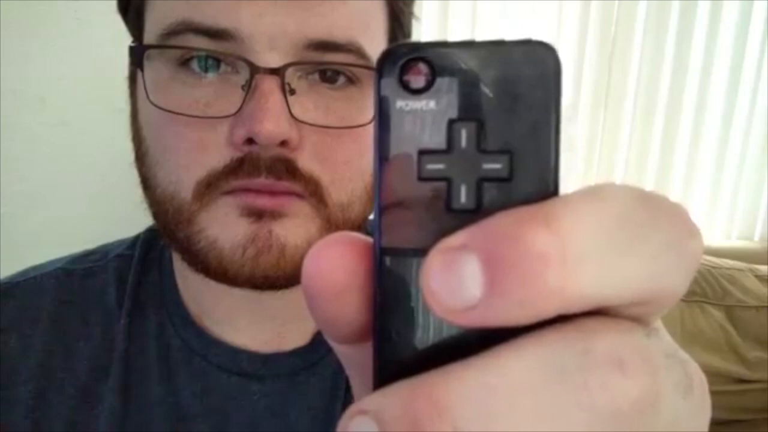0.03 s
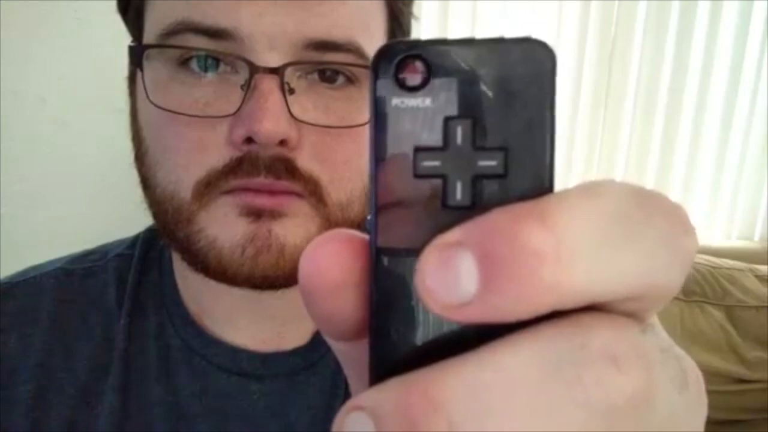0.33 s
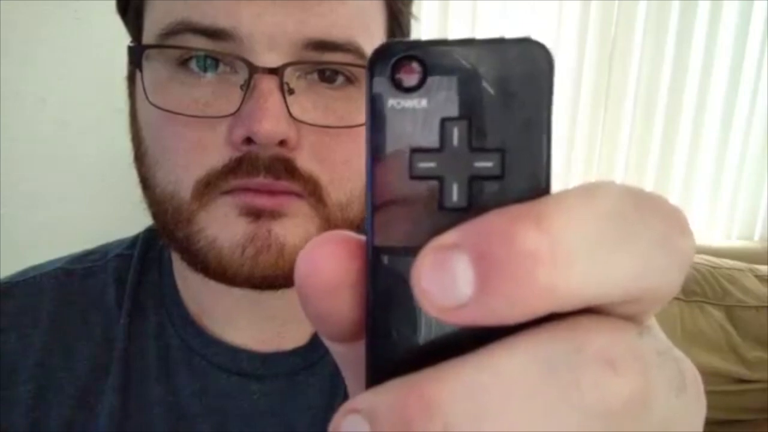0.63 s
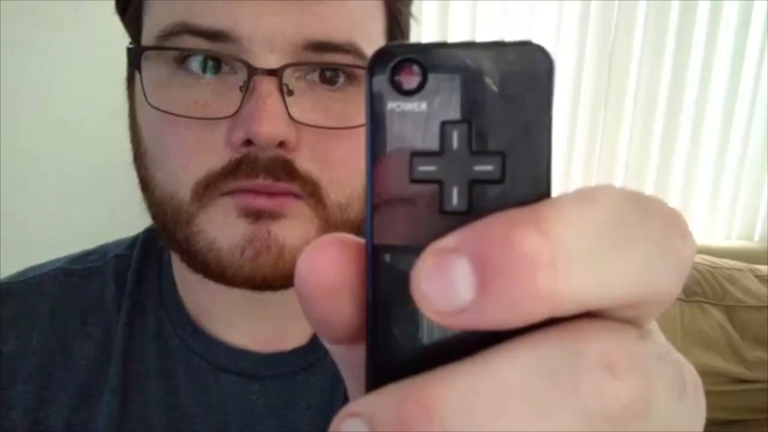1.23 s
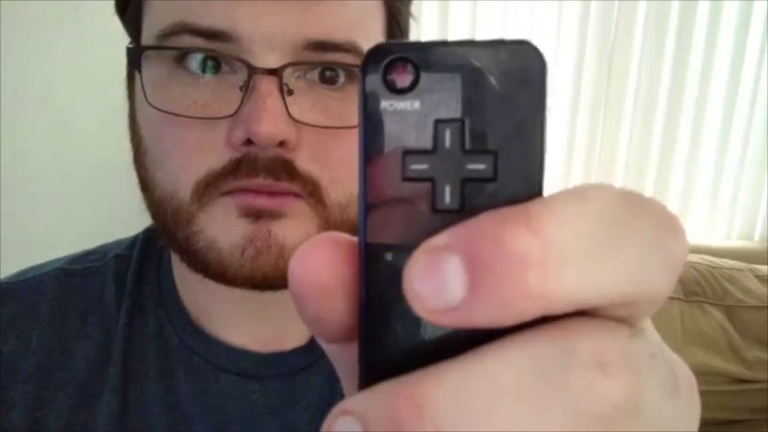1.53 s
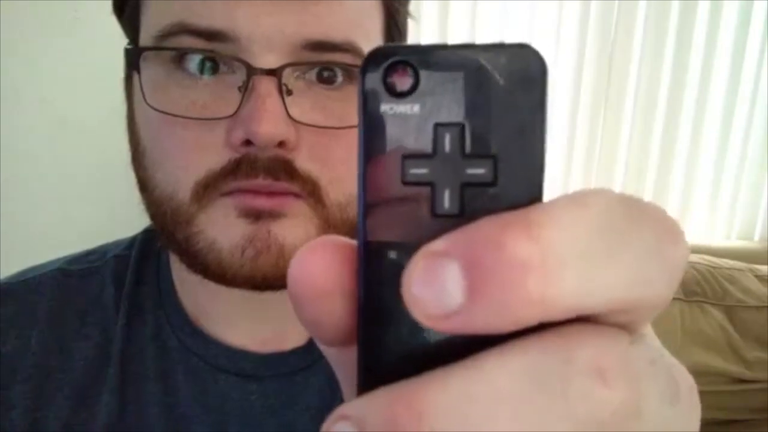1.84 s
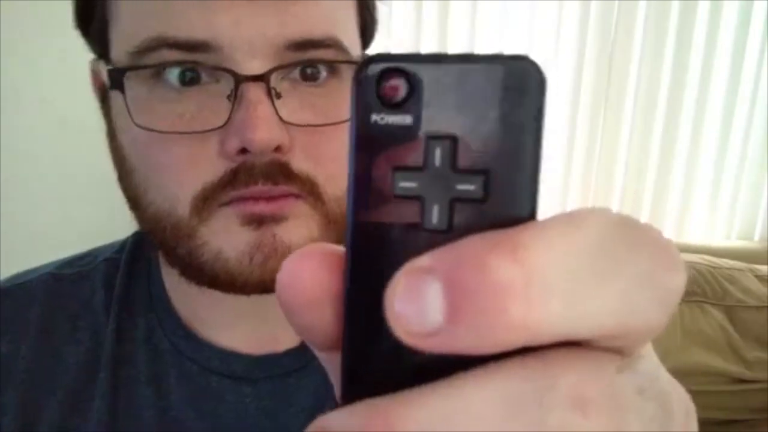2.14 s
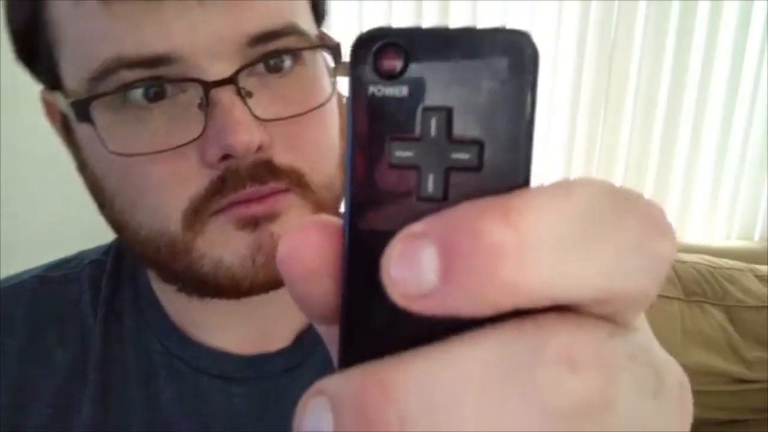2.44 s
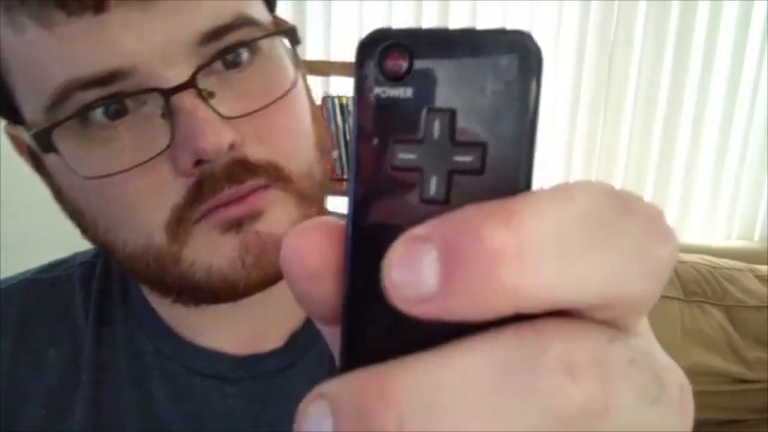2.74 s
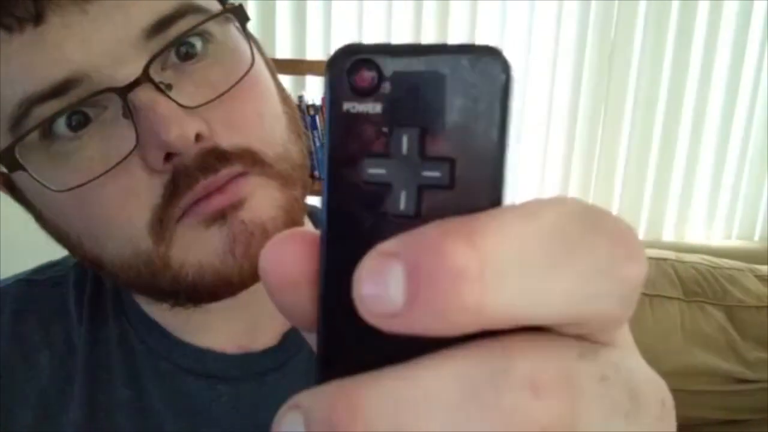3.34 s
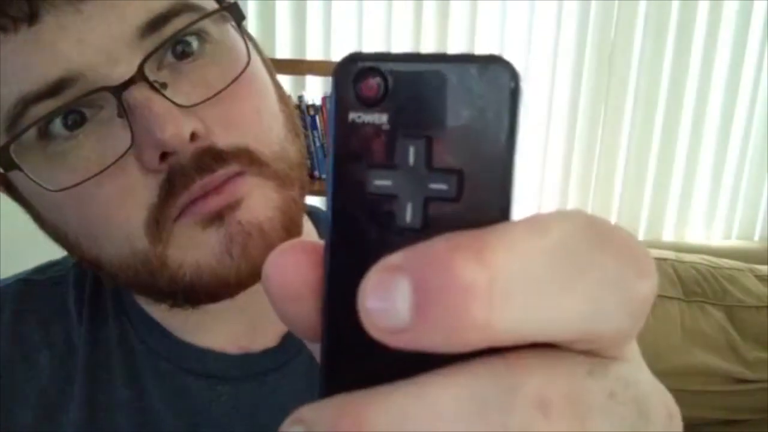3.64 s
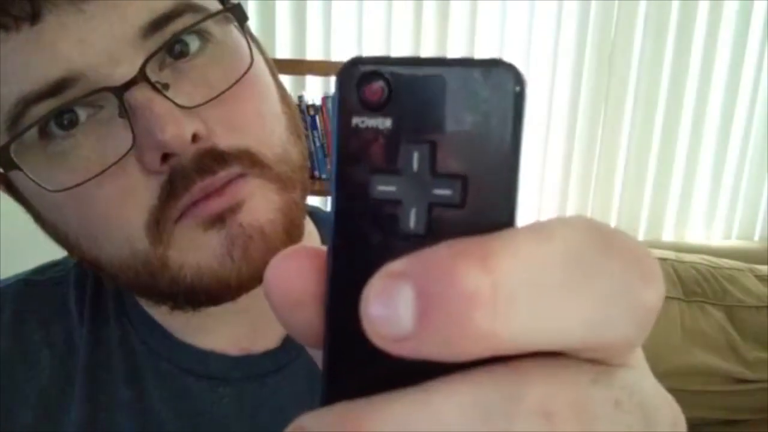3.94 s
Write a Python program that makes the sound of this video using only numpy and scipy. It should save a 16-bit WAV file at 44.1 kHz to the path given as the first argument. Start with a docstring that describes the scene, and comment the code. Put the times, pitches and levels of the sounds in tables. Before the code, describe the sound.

A game controller's rumble motor buzzes close up from about 0.1 seconds until the end at 4, pulsing roughly five times a second. Each pulse climbs in pitch then sags, with a low drone and a raspy chatter in the plastic case. Steady, dull room noise lies behind it. A faint low hum swells around 2 and 3 seconds, with soft bumps near 2.2 and 2.9 seconds.

```python
"""The rumble motor of a handheld game controller buzzes in pulses, about five a second, heard up close.
It speeds up while powered and coasts between pulses. Its off-centre weight hums once a turn,
and its rotor (the spinning part) chatters and rubs in the plastic case.
Behind it are steady room noise, a low hum that swells twice and two soft bumps."""
import sys
import numpy as np
from scipy import signal
from scipy.fft import rfft, irfft
from scipy.io import wavfile
from scipy.ndimage import uniform_filter1d

SR = 44100
rng = np.random.default_rng(int(sys.argv[2]) if len(sys.argv) > 2 else 0)


def store_wav(level_fs):
    """Save 16-bit WAV to argv[1]."""
    pcm = np.round(np.clip(np.atleast_2d(level_fs), -1, 1) * 32767)
    wavfile.write(sys.argv[1], SR, pcm.T.astype(np.int16))


N = 176400
T = np.arange(N) / SR

# When the motor gets power. Each row: switch-on time in seconds, switch-off time in seconds.
POWER_PULSES = [(0.0701, 0.193), (0.2551, 0.3965), (0.4583, 0.5997), (0.6626, 0.8033), (0.8655, 0.9666),
                (1.0305, 1.1725), (1.2345, 1.3421), (1.4039, 1.5028), (1.5648, 1.7071), (1.7717, 1.8751),
                (1.9365, 2.0401), (2.099, 2.2455), (2.3067, 2.409), (2.4708, 2.5724), (2.6344, 2.736),
                (2.7977, 2.9001), (2.961, 3.1036), (3.1687, 3.3125), (3.373, 3.5175), (3.5769, 3.7216),
                (3.7817, 3.9271), (3.9854, 4.1)]
# The tones in the chatter. Each row: cycles per turn, base level in dB when powered, and when coasting.
CHATTER_TONES = [(9, -54.0, -63.1), (10, -51.5, -57.0), (11, -57.2, -59.5), (13, -51.0, -62.4),
                 (14, -54.2, -53.7), (15, -43.3, -58.4), (16, -45.4, -47.3), (17, -49.3, -48.4),
                 (18, -50.1, -56.1), (19, -44.7, -55.7), (20, -41.2, -51.1), (21, -45.8, -54.5),
                 (22, -46.1, -46.5), (23, -42.3, -50.6), (24, -45.2, -44.3), (25, -37.8, -42.1),
                 (26, -39.8, -40.7), (27, -41.3, -41.8), (28, -44.2, -47.0), (29, -52.2, -48.6),
                 (30, -60.9, -58.5), (31, -60.0, -61.7), (32, -57.5, -58.2), (33, -54.9, -61.3),
                 (35, -61.8, -68.8), (36, -63.1, -70.5), (37, -62.4, -65.9), (38, -59.5, -66.8),
                 (39, -67.1, -64.0), (40, -68.2, -68.8), (41, -62.9, -67.8), (44, -76.3, -69.9),
                 (46, -70.0, -73.8)]
# Spots where the rotor catches, the main one first. Each row: position in turns, middle and spread
# of its tones in cycles per turn, strength in dB when powered, and when coasting.
CATCH_SPOTS = [(0, 25.8, 2.6, -1, -12), (.05, 16.5, 2.2, -7.5, -12.5), (.23, 20.3, 2, -9.5, -25),
               (.6, 23.5, 2.8, -5, -19), (.5, 15.5, 2, -9, -12.5), (-.08, 35, 3, -30, -21)]
# A lift, while powered, for tones far from those of the main catch. Each row: time in seconds, lift in dB.
OUTER_TONE_LIFT = [(0, 0), (.6, 1.5), (1.4, 1), (2.2, 1), (2.7, 2), (3.1, 1.5), (4, 1.5)]
# How the plastic case colours the chatter. Each row: frequency in Hz, boost or cut in dB.
CASE_COLOUR = [(1200, 0), (1550, -5), (1900, -3), (2100, 1), (2300, 1), (2450, 1), (2750, -1.2),
               (3000, -.8), (3300, 1.5), (3650, .8), (3900, -1.5), (4250, -3.5), (4450, -.5), (5500, -1.5),
               (5780, 4), (6200, -1)]
# The colour of the rubbing noise. Each row: frequency in Hz, relative level in dB.
RUB_COLOUR = [(1200, -33), (1800, -13), (2150, -5), (2450, 4.5), (2700, -3), (3000, -10), (3400, 2),
              (4100, -6), (4900, -10.5), (5800, -9), (6250, -13), (6650, -12.5), (7500, -25)]
# The colour of the room noise. Each row: frequency in Hz, relative level in dB.
ROOM_COLOUR = [(20, -1.5), (45, -7), (70, -4.5), (110, -2), (170, 0.5), (260, -2), (350, -5.5), (480, -6),
               (600, -9), (850, -11), (1100, -13), (1300, -13.5), (1550, -16), (2200, -17.5), (3200, -17.5),
               (4300, -25), (6000, -31.5), (6650, -30), (7300, -32.5), (9300, -34), (9950, -32),
               (10700, -34.5), (15000, -36.5)]
# How the low hum swells. Each row: time in seconds, level in dB.
HUM_SWELLS = [(0, -54), (1.4, -54), (1.72, -47), (1.88, -37.5), (2.15, -38.5), (2.32, -47), (2.5, -52),
              (2.68, -37), (2.98, -38), (3.12, -37), (3.28, -49), (4, -62)]
# Soft bumps. Each row: middle time and length in seconds, pitch and pitch spread in Hz, level in dB.
SOFT_BUMPS = [(2.2, 0.068, 42, 30, -32), (2.932, 0.091, 166, 22, -27)]

USUAL_HZ = 130  # the motor's usual speed, in turns per second


def motor():
    """One spinning shaft drives the weight's hum, the rubbing and the chatter, so all keep in step."""
    speed, power = shaft_speed(), powered()
    turns = .085 + np.cumsum(speed) / SR + .0005 * drift(rate_hz=40)  # with a tiny jitter
    return weight_hum(speed, turns) + rubbing(speed, turns, power) + chatter(speed, turns, power)


def shaft_speed():
    """Turns per second: climbs toward top speed while powered and sinks while coasting."""
    start_hz, top_hz, spin_up_s, coast_s = 98.75, 155.553, .09036, .23339
    speed = np.full(N, start_hz)
    for on, off in POWER_PULSES:
        for start_s, goal_hz, lag_s in (on, top_hz, spin_up_s), (off, 0, coast_s):
            i = min(round(start_s * SR), N - 1)
            speed[i:] = goal_hz + (speed[i] - goal_hz) * np.exp(-T[:N - i] / lag_s)
    return speed


def powered():
    """1 while powered, 0 while coasting; the rotor takes a moment to shift on its shaft in between."""
    shift_s = 0.0044
    switched_on = 1.0 * (sum((T > on) & (T < off) for on, off in POWER_PULSES) > 0)
    keep = np.exp(-1 / (shift_s * SR))
    return signal.lfilter([1 - keep], [1, -keep], switched_on)


def weight_hum(speed, turns):
    """The off-centre weight shakes the case once a turn, much harder as it spins faster."""
    level_db = -36 + drift(rate_hz=4)
    return np.sqrt(2) * np.cos(2 * np.pi * turns) * (speed / USUAL_HZ) ** 4.4 * amp(level_db)


def chatter(speed, turns, power):
    """The rotor catches at the same spots each turn, so its tones bunch into short bursts."""
    out = np.zeros(N)
    lift_db = np.interp(T, *np.transpose(OUTER_TONE_LIFT)) + 1.6 * 20 * np.log10(speed / USUAL_HZ)
    _, main_middle, main_spread = CATCH_SPOTS[0][:3]
    for per_turn, powered_db, coasting_db in CHATTER_TONES:
        outer = 1 - np.exp(-((per_turn - main_middle) / main_spread) ** 2 / 2)  # 1 far from the main catch
        phase = 2 * np.pi * per_turn * turns
        driven = amp(powered_db + outer * lift_db) * np.cos(phase + catch_phase(per_turn, coasting=False))
        coasting = amp(coasting_db + 2.6) * np.cos(phase + catch_phase(per_turn, coasting=True))
        case_gain = amp(colour_db(CASE_COLOUR, per_turn * speed))
        out += case_gain * (power * driven + (1 - power) * coasting)
    level_db = 2.2 - 0.23 * drift(rate_hz=30) + 0.04 * (T - T.mean())  # flickers and grows a little
    return out * amp(level_db) * (speed / USUAL_HZ) ** 0.81


def catch_phase(per_turn, coasting):
    """Shifts one tone, in radians, so its peaks lean toward the catches that ring it most."""
    pull = 0
    for position, middle, spread, powered_db, coasting_db in CATCH_SPOTS:
        strength = amp(coasting_db if coasting else powered_db)
        nearness = np.exp(-((per_turn - middle) / spread) ** 2 / 2)
        pull += strength * nearness * np.exp(-2j * np.pi * per_turn * position)
    return np.angle(pull)


def rubbing(speed, turns, power):
    """The rotor rubs with a hiss that gathers at the main catch, loudest when slow or coasting."""
    hiss = noise(lambda hz: amp(colour_db(RUB_COLOUR, hz)))
    at_catch = np.exp(.6 * np.cos(np.pi * turns) ** 2)
    coasting_gain = amp(4.5 * (1 - power))
    return amp(-42.5) * evened(hiss * at_catch * coasting_gain / (speed / USUAL_HZ) ** 2)


def room():
    """Steady, dull room noise that wavers in faint patches; its lower part slowly grows."""
    hz, times, spectrum = signal.stft(rng.standard_normal(N), SR, nperseg=1024, noverlap=768)
    patches = uniform_filter1d(rng.standard_normal(spectrum.shape), size=10, axis=0)  # blur over pitch
    patches = evened(uniform_filter1d(patches, size=12, axis=1))  # then over time
    growth_db = 0.34 * np.outer(np.exp(-(hz / 2000) ** 2), times - times.mean())
    spectrum *= amp(colour_db(ROOM_COLOUR, hz)[:, None] + 0.99 * patches + growth_db)
    return amp(-28.5) * evened(signal.istft(spectrum, nperseg=1024, noverlap=768)[1][:N])


def low_hum():
    """A low, slightly unsteady tone that swells twice."""
    pitch_hz = 72 + 0.87 * drift(rate_hz=5.6)
    level_db = np.interp(T, *np.transpose(HUM_SWELLS))
    return np.sqrt(2) * amp(level_db) * np.sin(2 * np.pi * np.cumsum(pitch_hz) / SR)


def bumps():
    """Short, soft swells of deep noise."""
    out = np.zeros(N)
    for middle_s, length_s, pitch_hz, spread_hz, level_db in SOFT_BUMPS:
        swell = np.exp(-(2 * (T - middle_s) / length_s) ** 2)
        bump = swell * noise(lambda hz: np.exp(-((hz - pitch_hz) / spread_hz) ** 2))
        out += amp(level_db) * bump * np.linalg.norm(swell) / np.linalg.norm(bump)
    return out


def amp(db):
    """Turns decibels into a number to multiply by."""
    return 10 ** (db / 20)


def evened(x):
    """Scales a signal so its typical size (rms) is 1."""
    return x / np.sqrt(np.mean(x ** 2) + 1e-20)


def colour_db(table, hz):
    """Looks up a level in dB, sliding between the table's rows by musical pitch."""
    row_hz, row_db = np.transpose(table)
    return np.interp(np.log(hz + 1), np.log(row_hz + 1), row_db)


def noise(shape):
    """Noise of typical size 1; shape(hz) says how strong each frequency is."""
    return evened(irfft(rfft(rng.standard_normal(N)) * shape(np.fft.rfftfreq(N, 1 / SR)), N))


def drift(rate_hz):
    """A smooth random wobble, mostly slower than rate_hz."""
    return noise(lambda hz: np.exp(-(hz / rate_hz) ** 2))


def scene():
    """The motor and its background, the same in both channels."""
    return np.tile(motor() + room() + low_hum() + bumps(), (2, 1))


def record(dry):
    """Fades the sound in quickly and cuts off the highest treble."""
    silent_s, fade_s, cutoff_hz = 0.08, 0.026, 15100
    fade_in = np.sin(np.pi / 2 * np.clip((T - silent_s) / fade_s, 0, 1)) ** 2
    treble_cut = signal.firwin(511, cutoff_hz, window=("kaiser", 9), fs=SR)
    return signal.oaconvolve(dry * fade_in, treble_cut[None], "same")


dry = scene()
out = record(dry)
store_wav(out)
```